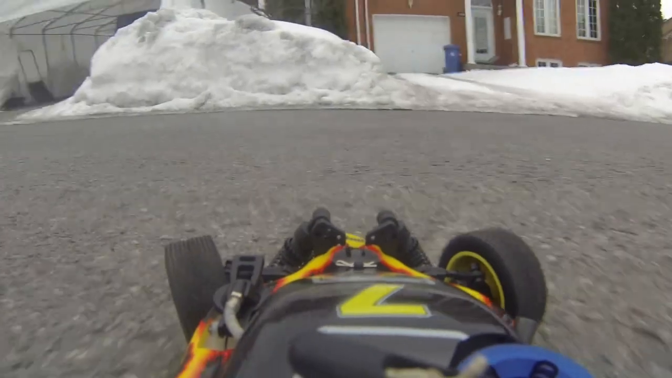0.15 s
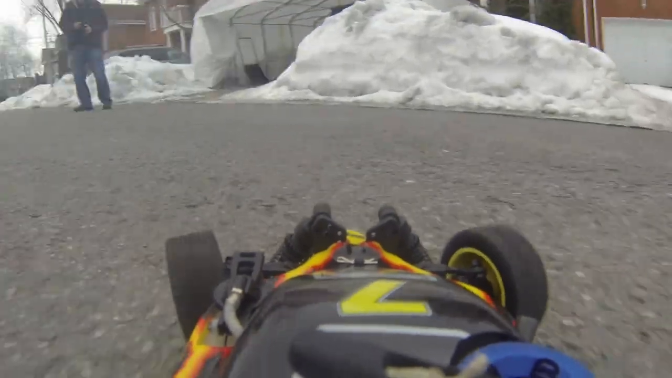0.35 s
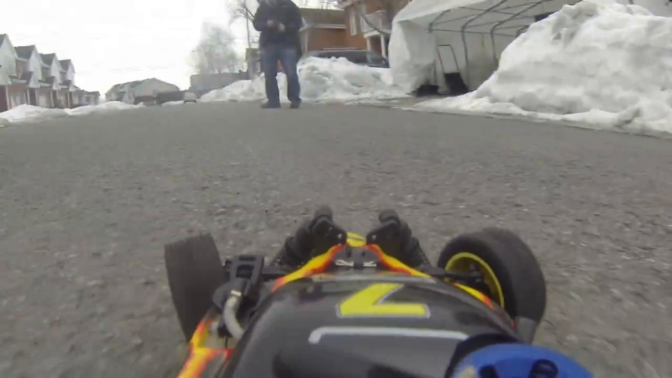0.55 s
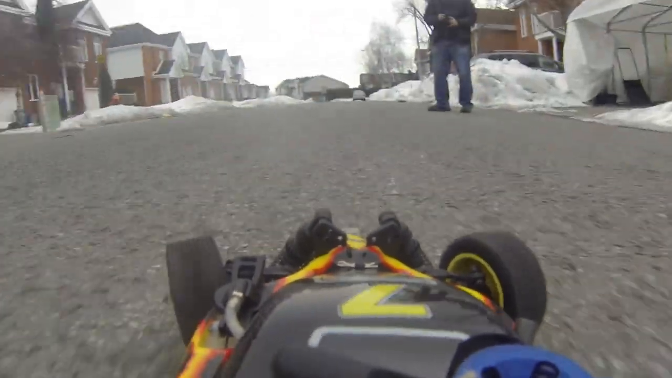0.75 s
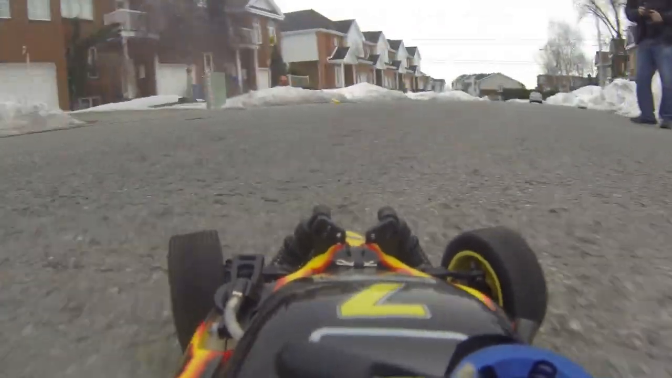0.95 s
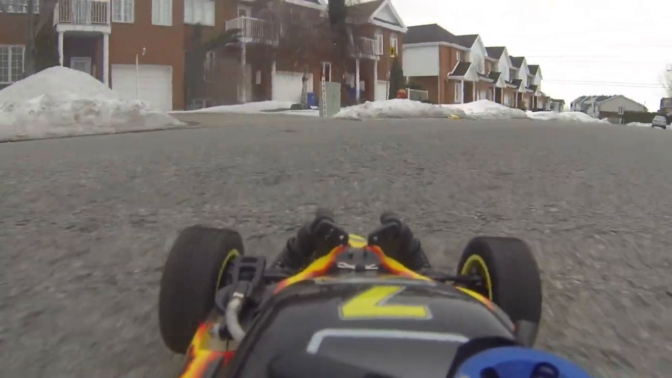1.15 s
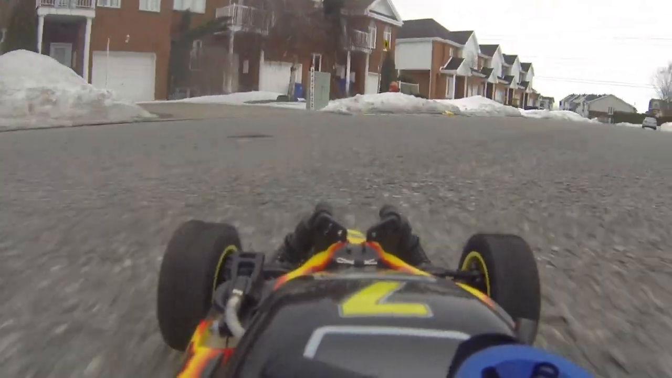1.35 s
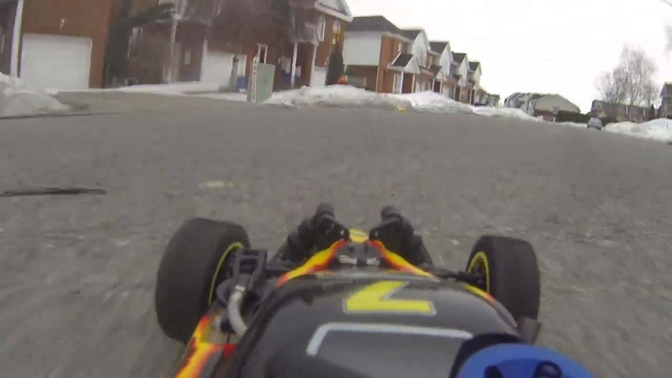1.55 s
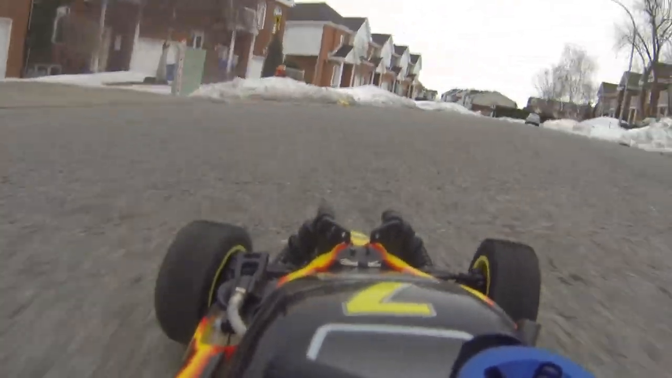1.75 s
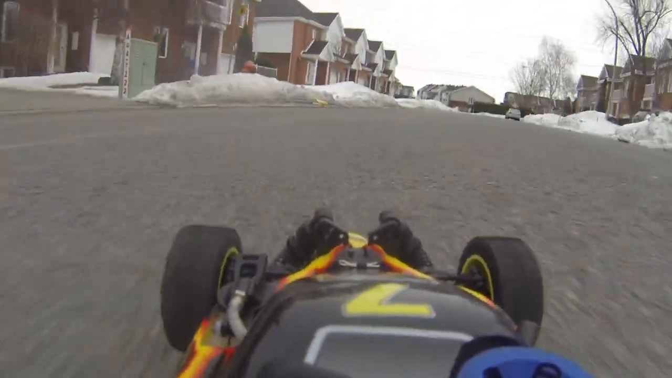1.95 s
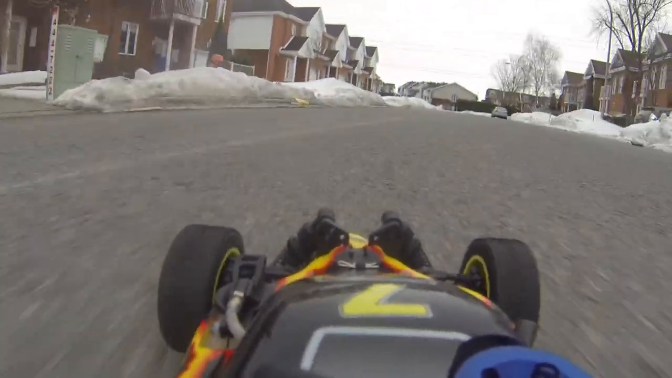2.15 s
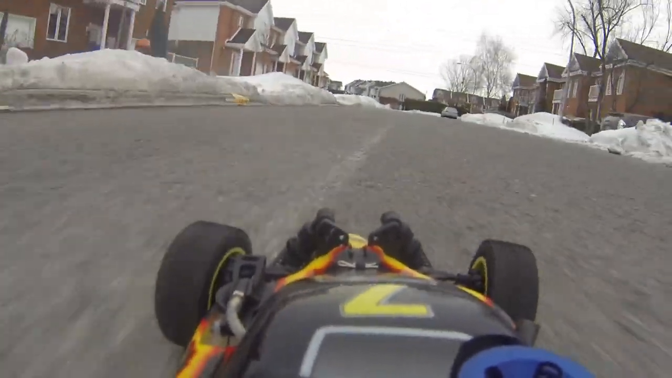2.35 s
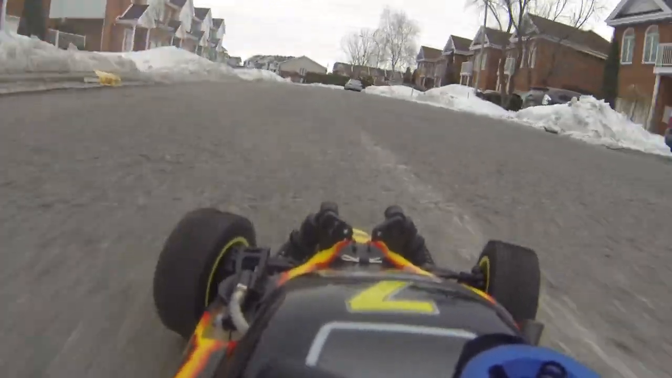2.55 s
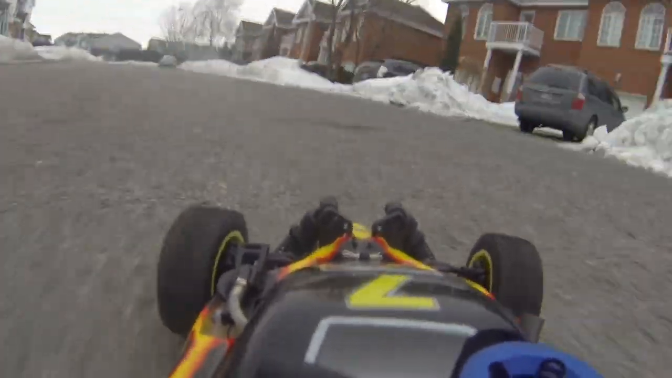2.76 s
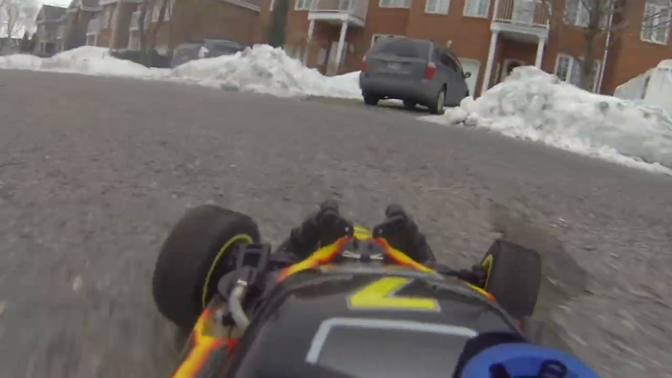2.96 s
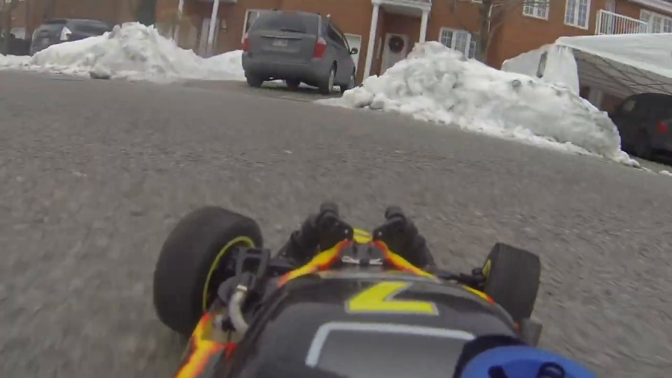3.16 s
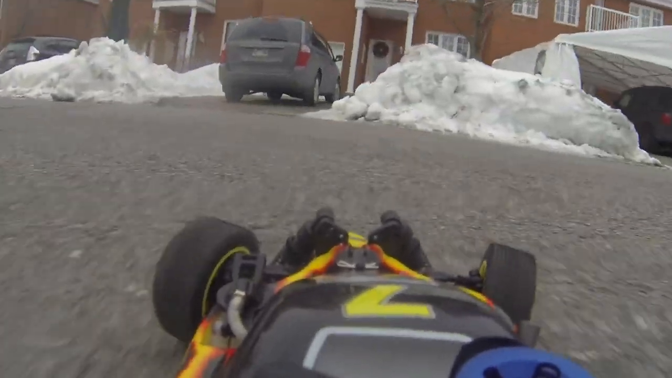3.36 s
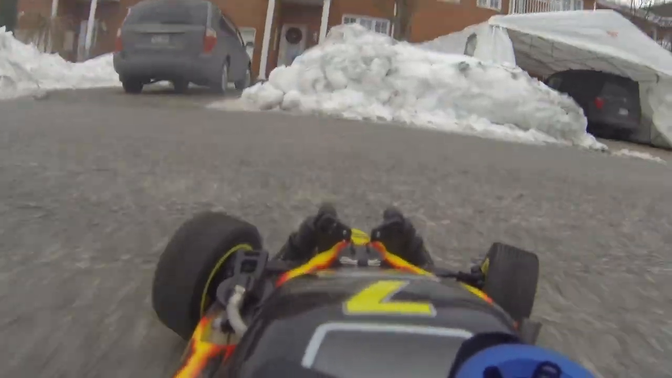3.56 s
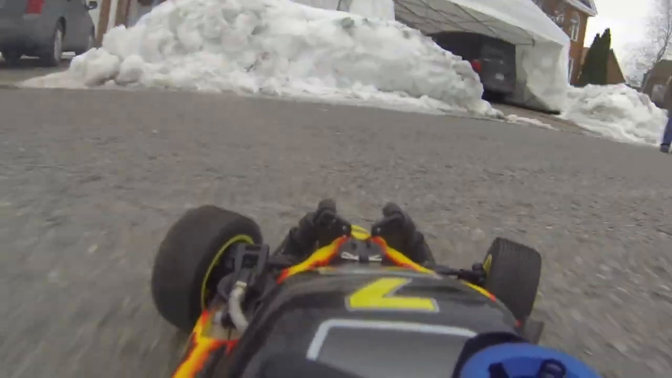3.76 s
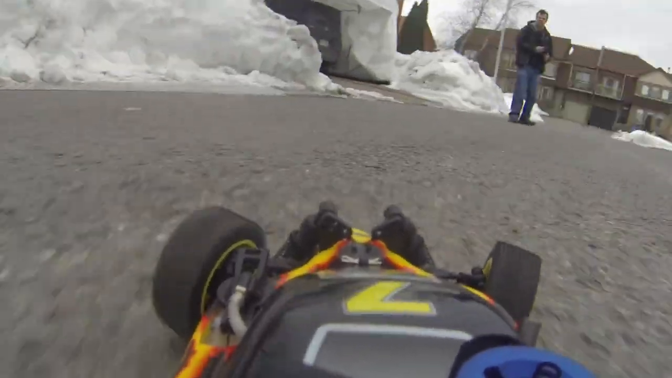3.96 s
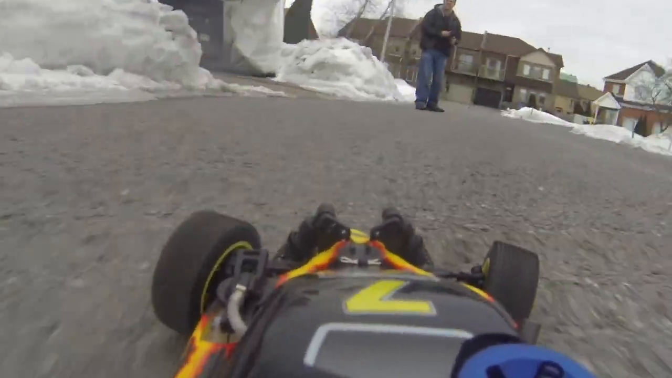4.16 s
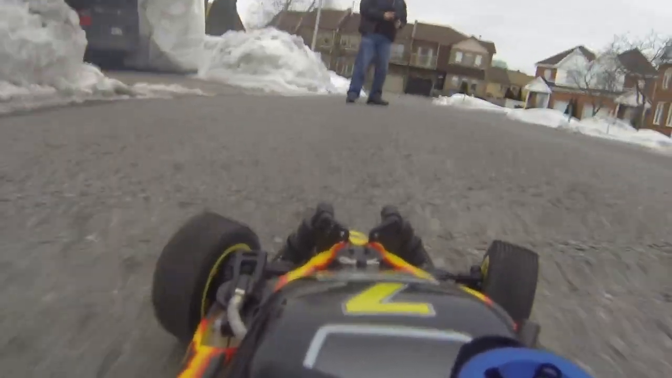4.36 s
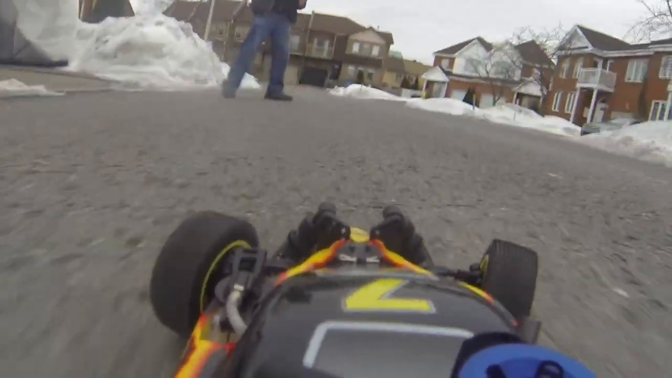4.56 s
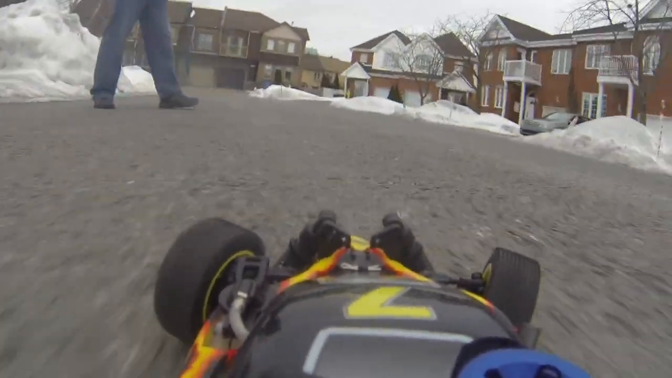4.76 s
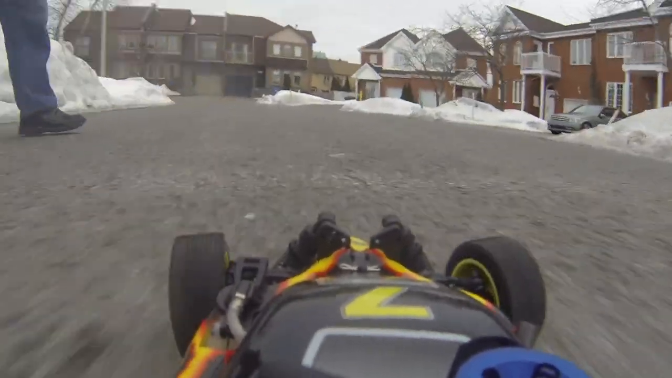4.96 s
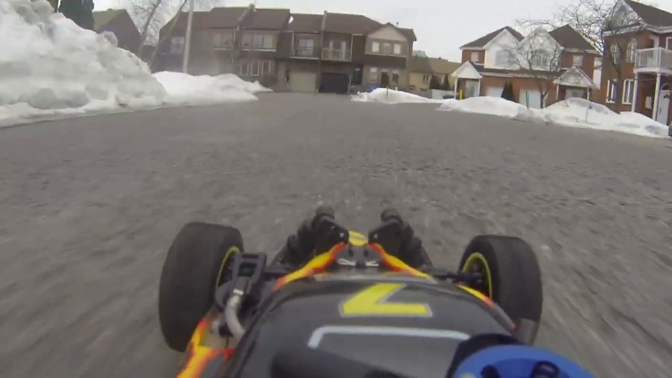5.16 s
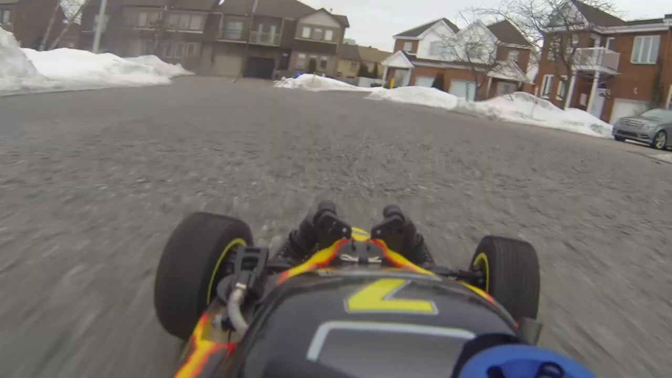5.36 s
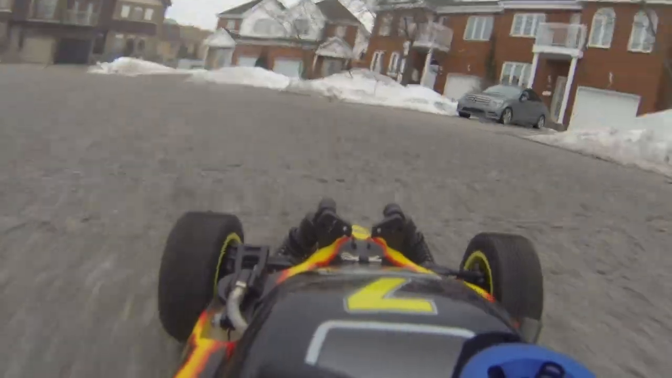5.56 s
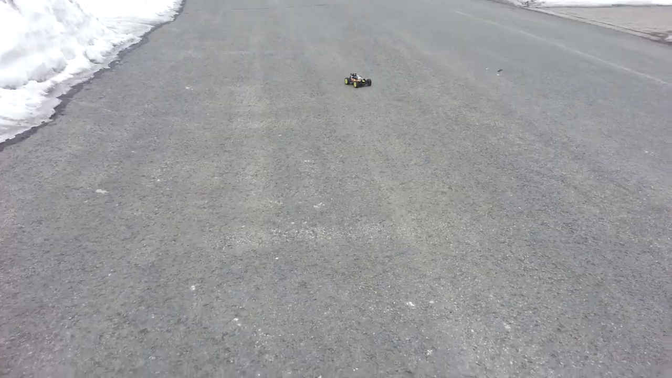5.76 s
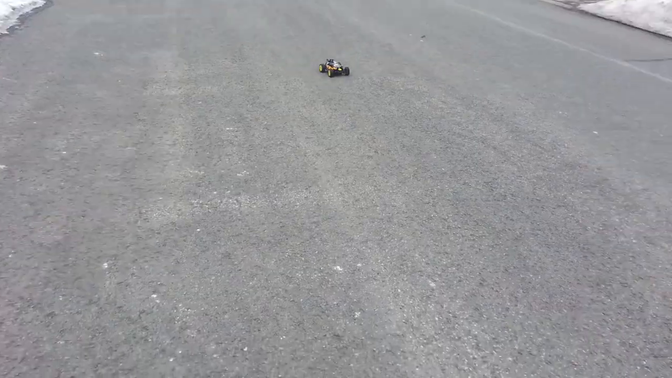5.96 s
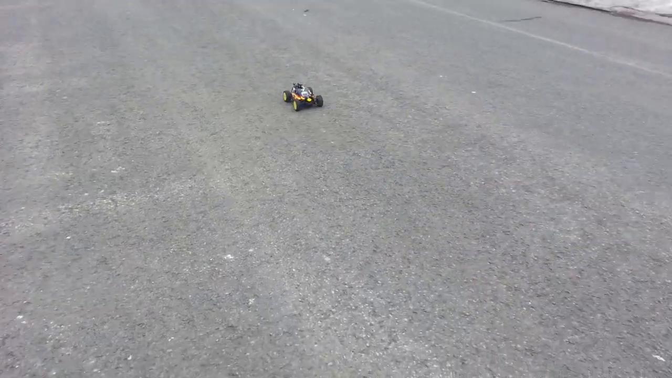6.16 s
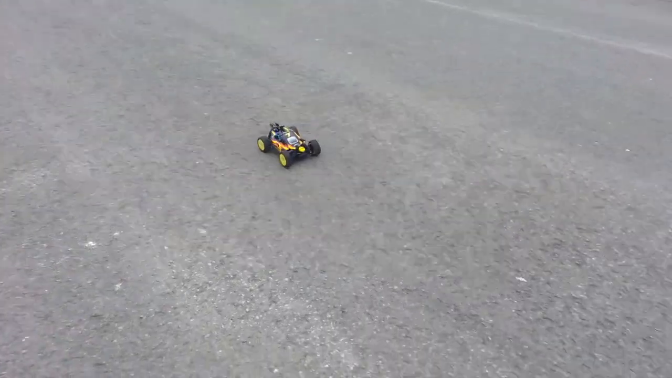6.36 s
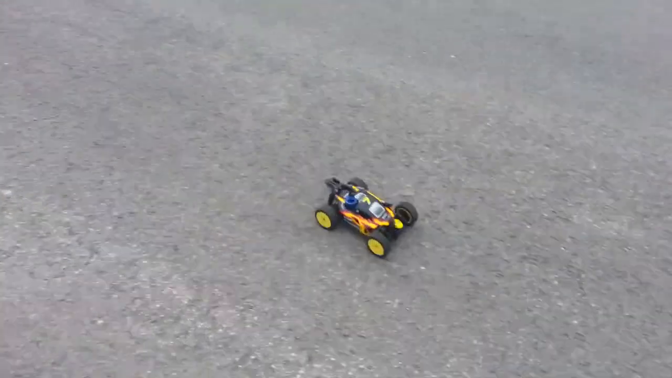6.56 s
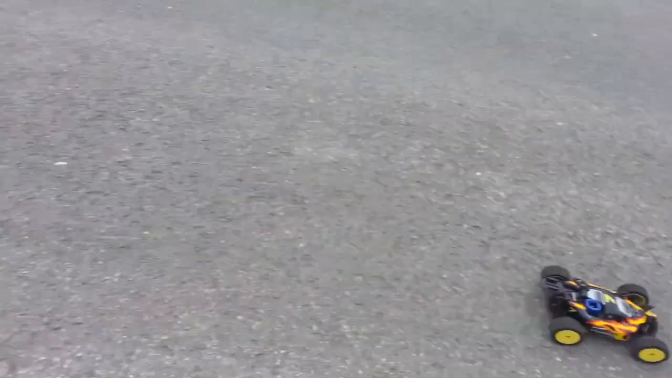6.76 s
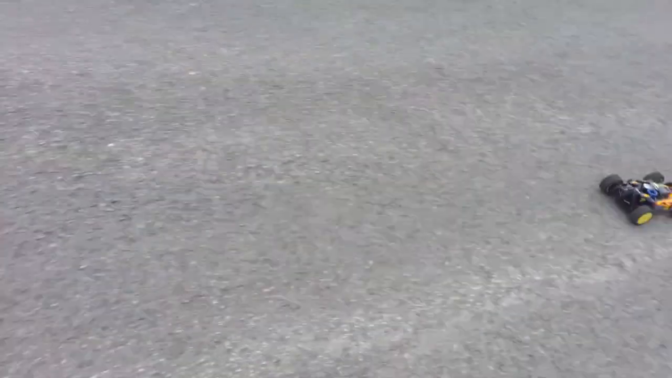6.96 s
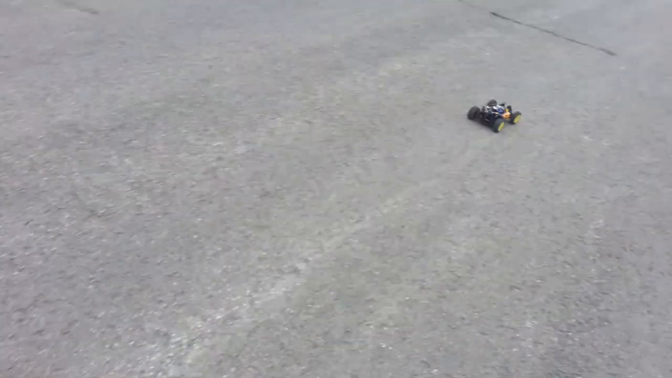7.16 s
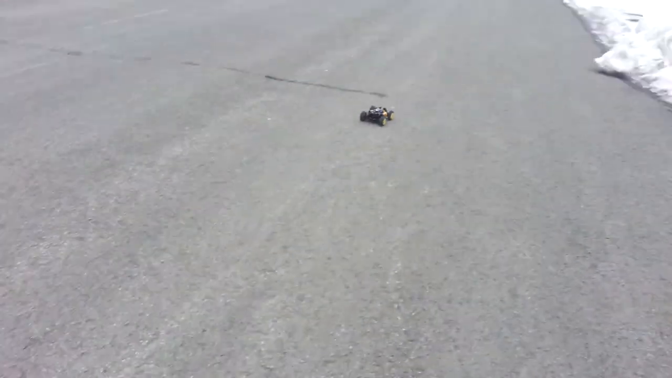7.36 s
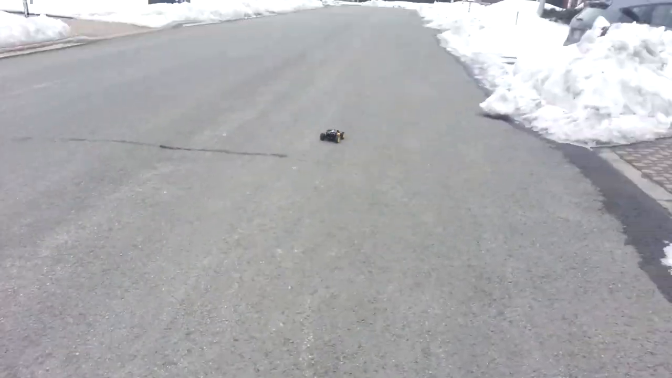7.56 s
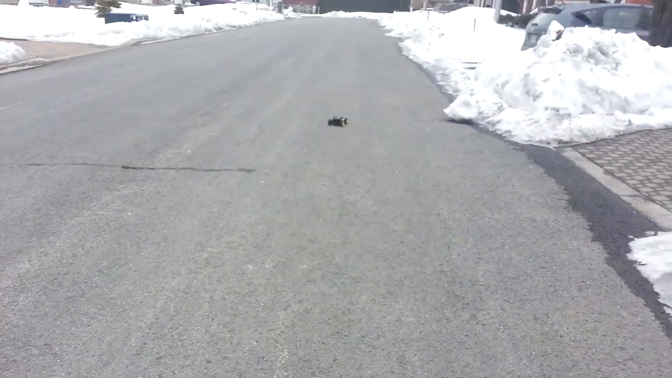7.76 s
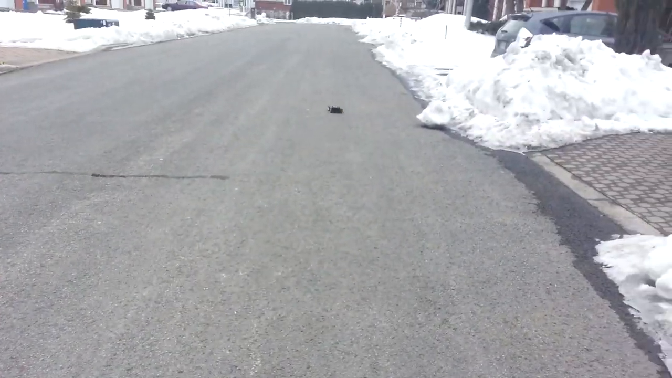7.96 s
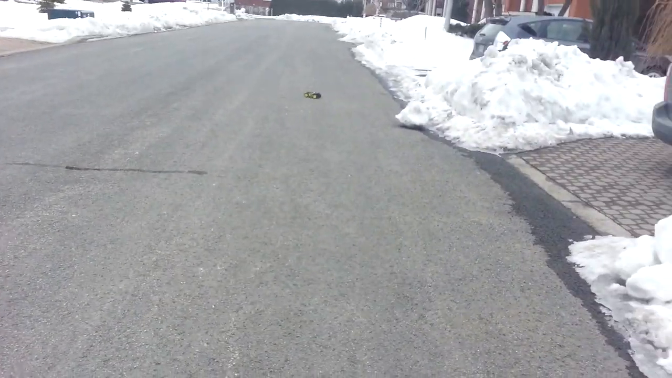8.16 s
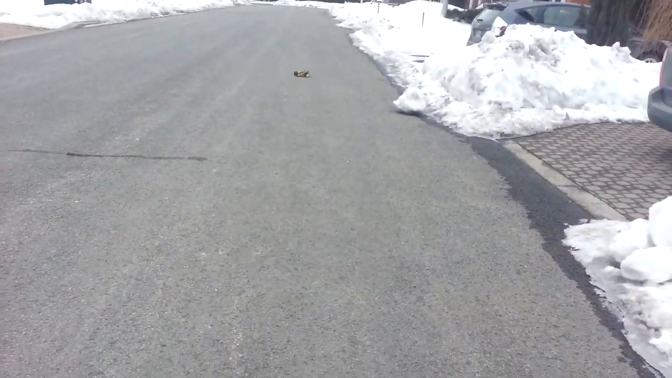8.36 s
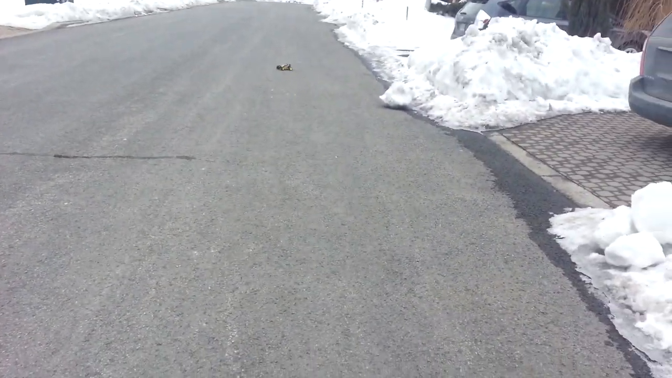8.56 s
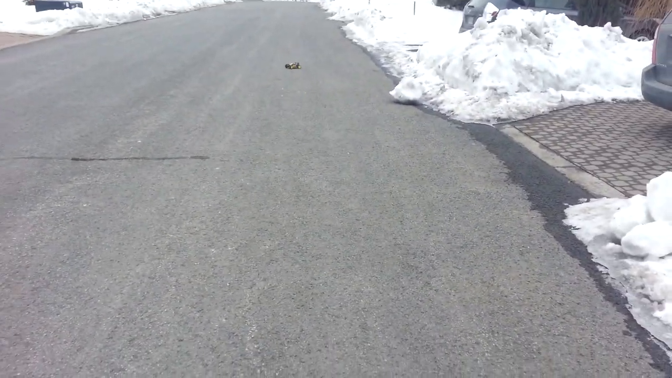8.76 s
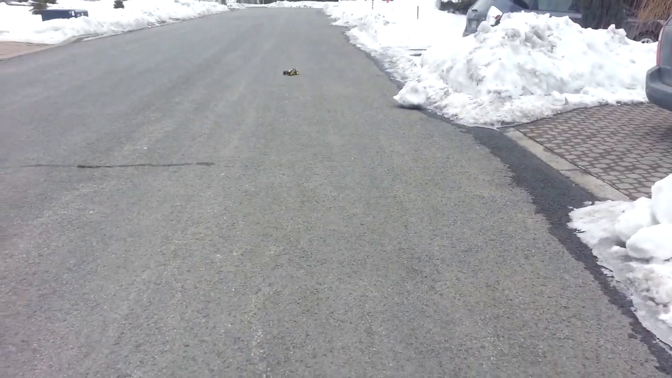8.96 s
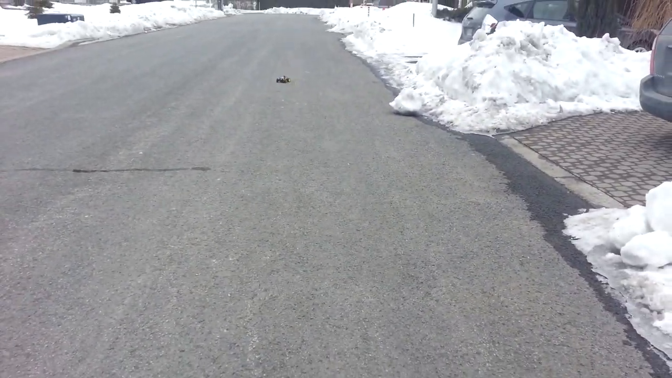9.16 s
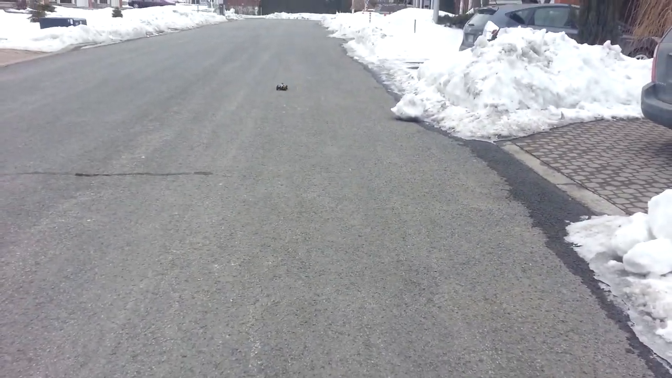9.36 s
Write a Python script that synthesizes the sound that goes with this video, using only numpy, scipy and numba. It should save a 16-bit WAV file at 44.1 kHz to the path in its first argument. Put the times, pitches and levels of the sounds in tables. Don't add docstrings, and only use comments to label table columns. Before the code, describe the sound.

From 0 to 5.7 seconds the microphone rides in a sealed case on a small two-stroke model car. A dull, nearly pure hum near 220 Hz chatters with short throttle bursts and low road rumble, with a bump near 0.25. From 1.4 it climbs to a strained peak around 2 seconds with ringing rattle and wavering gear whine, then falls by 2.7. It surges again around 3.2-3.5, drops with two small stone pings near 3.8, then revs from 4.1 to 5.4 and sinks. At 5.7 an abrupt cut goes to the roadside: a raspy, brighter exhaust buzz approaches, loudest at 6.5-7, passes, and recedes while its pitch creeps upward until 7.9. The throttle shuts, pitch falls to a weak distant idle by 8.3, with blips near 8.8 and 9.3. Wind thumps, mostly around 6-6.7, and tiny dropouts four times a second accompany it.

```python
import sys
import numpy as np
from scipy import signal
from scipy.fft import rfft, irfft
from scipy.io import wavfile
from scipy.ndimage import uniform_filter1d
from numba import njit

SR = 44100
rng = np.random.default_rng(int(sys.argv[2]) if len(sys.argv) > 2 else 0)


def volts_from_decibels(level):
    exponent = np.asarray(level, float) / 20
    return 10 ** exponent


def dump(signal):
    limited = np.clip(np.atleast_2d(signal).T, -1, 1)
    pcm = np.round(limited * 32767).astype(np.int16)
    wavfile.write(sys.argv[1], SR, pcm)


N = 414540
TIME = np.arange(N) / SR
SIDES = np.array([[1], [-1]])
CHANGE_S = 5.7446

# t/s, shaft speed approached f/Hz, lag/s, strain on the drive level/dB
THROTTLE = [(0, 219.7, 0.018, -0.5), (.491, 242, 0.016, 2), (.554, 212.4, 0.016, -0.5),
            (.668, 237.6, 0.024, 3), (0.807, 217.8, .013, 0), (1.0, 220.5, 0.0092, 3.5),
            (1.108, 239.7, 0.011, 4.5), (1.397, 726, 1.75, 1), (2.04, 466.6, 0.27, -2),
            (2.425, 213.8, 0.31, -2), (3.042, 209.9, .29, 0.5), (3.198, 308, 0.56, 3.5),
            (3.44, 440, 0.46, 0), (3.565, 225.6, .1, -4.5), (3.85, 224.6, .1, 3), (4.122, 334.3, 0.21, 2),
            (4.348, 287, 0.022, 1), (4.436, 451.7, 0.42, 0.5), (4.938, 334, 0.64, 0),
            (5.209, 371, 0.009, -0.5), (5.391, 222.4, 0.33, -1.5)]
# shaft f/Hz, hum level/dB, rattle level/dB, rumble level/dB, knock level/dB
BY_SPEED = [
    (221, -20, -34, -37.5, -39),
    (231.4, -20, -31, -39.5, -42.5),
    (286, -18, -37, -47, -34),
    (366, -19.5, -30, -40.5, -36.5),
    (440, -20, -22.5, -37, -31.5),
]
# t/s, f/Hz, level/dB
MESH_RUNS = [
    [(1.15, 960, -58), (1.22, 950, -35), (1.462, 1245, -35), (1.6, 1546, -55)],
    [(1.7, 1173, -45), (1.85, 1191, -29), (2.244, 1487, -30), (2.512, 1470, -33.5), (2.728, 1168, -49),
     (2.85, 1192, -64)],
    [(3.2, 1056, -43), (3.302, 1182, -34.5), (3.5, 1300, -44)],
    [(3.95, 1010, -64), (4.118, 1025, -33), (4.25, 1307, -47)],
    [(4.5, 1188, -55), (4.602, 1163, -31), (4.9, 1363, -26.5), (5.368, 1244, -33), (5.476, 1257, -55),
     (5.7, 877.3, -48)],
]
# f/Hz, width/Hz, level/dB
CASE = [(550, 425, -10.5), (983, 49, 4.5), (1174, 243, -1), (1300, 69.4, 7.5), (1510, 133, 5),
        (2060, 330, -1), (2570, 272, 0.5), (3073, 650, -6)]
CASE_TREBLE = [(3716, 100, 15.5), (4720, 240, 8), (5150, 480, 5), (7700, 900, -18.5), (7040, 380, -17),
               (10600, 620, -32), (12500, 3000, -37)]
# f/Hz, width/Hz, level/dB
MOUNT = [(582, 85, 3), (916, 59, 4), (992, 51, 2.5), (1204, 75, 5.5), (1566, 209, 7.5), (2010, 750, -5),
         (2594, 160, -7.5), (3800, 200, -14), (5230, 210, -19)]
# t/s, level/dB, length/s
BUMPS = [
    (.25, 8, 0.16),
    (2.75, 3.5, 0.17),
    (3.2, 7, 0.13),
    (5.5, 0.5, 0.23),
    (2.2, -8, 0.3),
    (4.7, -7, 0.22),
]
# t/s, peak level/dB, f/Hz, decay/s
GRIT = [
    (3.778, -24, 2900, 0.0073),
    (3.832, -24, 2900, 0.0067),
    (3.72, -37, 3300, .006),
]

# t/s, firing f/Hz
FIRING = [(5.75, 319), (5.88, 324), (5.98, 332.5), (6.06, 335.8), (6.13, 339), (6.2, 336.5), (6.3, 340.7),
          (6.55, 349.2), (6.81, 356.4), (7.05, 362.8), (7.31, 369.7), (7.6, 377.1), (7.89, 386.6),
          (7.93, 372.7), (8.05, 308), (8.17, 251.1), (8.28, 213.4), (8.77, 218.6), (8.825, 237.9),
          (8.88, 225.9), (8.96, 232.5), (9.02, 211.9), (9.22, 213.5), (9.33, 233.3), (9.4, 235.8)]
# t/s, strict alternation of strong and weak pops 0-1, timing scatter/us, tail level/dB, gas level/dB
BURN = [(5.75, .8, 12, -7.5, -6), (6.0, .7, 12, -7.5, -6), (6.2, .2, 12, -7.5, -6), (7.9, .2, 12, -8, -6),
        (7.95, .3, 18, -6.5, -6), (8.22, .3, 18, -6.5, -6), (8.32, .2, 12, -6.5, -7),
        (9.4, .2, 12, -6.5, -7)]
# t/s, level/dB, aim of the pipe at the phone level/dB
PASS = [(5.75, -21, 3), (6.11, -19.5, -5), (6.55, -18, 4.5), (6.74, -17, 1.5), (6.79, -20.5, 1),
        (6.86, -17.5, -2.5), (6.95, -21.5, 0), (7.05, -21.5, -10), (7.31, -20, 3), (7.89, -21.5, 0),
        (7.93, -29.5, 11.5), (8.17, -30.5, 2.5), (8.22, -27.5, 1), (8.3, -29.5, -2), (8.76, -33.5, -4.5),
        (8.825, -29, -3.5), (8.96, -31.5, 0), (9.02, -34.5, 0.5), (9.22, -32, -6.5), (9.33, -29, -3),
        (9.4, -25.5, -7.5)]
# t/s, index into the nine pipe colours below
FACING = [(5.9, 0), (6.2, 1), (6.45, 1), (6.62, 2), (6.76, 2), (6.85, 3), (7.1, 3), (7.25, 4), (7.45, 4),
          (7.65, 5), (7.9, 5), (7.95, 6), (8.2, 6), (8.3, 7), (8.77, 7), (8.82, 8), (8.97, 8), (9.02, 7),
          (9.22, 7), (9.32, 8)]
# f/Hz, level/dB
COMING = [(160, -35), (320, -13), (1300, -10.5), (1720, -10.5), (1930, -4.5), (2300, -11), (2740, -17.5),
          (3580, -7.5), (4600, -13), (5400, -19), (8500, -30), (13000, -32.5), (16500, -70.5)]
CLOSING = [(160, -43), (340, -10.5), (773, -14.5), (1030, -8.5), (1610, -12.5), (2070, -11), (2750, -15.5),
           (3700, -7.5), (4500, -21.5), (5700, -14.5), (6900, -20.5), (8500, -14.5), (13000, -29),
           (16500, -69)]
BESIDE = [(180, -38.5), (350, -11.5), (700, -16), (1080, -13), (2080, -13.5), (2900, -21.5), (3550, -13),
          (4250, -13.5), (5100, -8.5), (5800, -16), (6600, -12), (7600, -17.5), (14400, -27),
          (16500, -66.5)]
PASSED = [(180, -46.5), (360, -11), (720, -15), (1080, -11), (1800, -10), (2300, -15.5), (2900, -10),
          (4000, -10.5), (5040, -2.5), (5450, -12), (6100, -9.5), (6800, -10.5), (7400, -15.5),
          (11000, -17), (14400, -21.5), (16500, -67)]
TURNING = [(190, -47.5), (370, -6.5), (740, -11.5), (1490, -3), (2230, -4), (2900, -11.5), (3700, -13),
           (4650, -8.5), (5600, -15), (6900, -18), (8300, -15), (9500, -19), (11300, -14), (13000, -16.5),
           (14600, -33), (16500, -66.5)]
LEAVING = [(190, -58), (380, -12), (1140, -9), (1520, -5), (2280, -7), (2850, -15), (3420, -3.5),
           (3800, -10.5), (4560, -5.5), (5000, -7.5), (5700, -19), (6600, -14), (7800, -18.5),
           (11200, -21.5), (13000, -25), (14600, -36), (16500, -73)]
COASTING = [(130, -30.5), (300, -9.5), (600, -7), (1600, -5), (2400, -6), (3200, -8), (4100, -8.5),
            (4900, -7.5), (5600, -16.5), (7800, -21), (9000, -32), (10800, -29.5), (15000, -59.5)]
IDLING = [(110, -32), (215, -9), (650, -5.5), (860, -17.5), (1080, -5), (1420, -11), (1770, 1.5),
          (2150, -8.5), (2580, -9.5), (3300, -3), (3900, -5), (4300, -11.5), (4900, -9.5), (5500, -20),
          (6200, -19.5), (8800, -36.5), (10400, -29.5), (15000, -53)]
BLIPPING = [(110, -42), (230, -8.5), (465, -7), (800, -17.5), (1390, -8.5), (1860, -4), (2150, -14),
            (2550, -16.5), (3350, -6), (3950, -12.5), (4300, -13.5), (4900, -13), (5500, -19.5),
            (6300, -21.5), (8800, -36), (10400, -33.5), (15000, -57.5)]
# t/s, low f/Hz, middle f/Hz, high f/Hz, depth 0-1
GAPS = [(5.75, 2720, 5740, 9240, .3), (6.3, 2730, 5670, 9300, .4), (6.7, 2290, 5820, 9500, .5),
        (6.85, 3840, 7020, 11800, .7), (6.97, 4020, 7830, 12500, 0.6), (7.12, 3600, 7380, 12200, .7),
        (7.25, 3110, 6100, 10500, 0.6), (7.4, 3000, 5870, 9070, 0.5), (7.55, 3000, 5780, 8800, 0.7),
        (7.95, 2920, 5580, 8940, 0.7), (9.4, 2590, 5450, 8760, 0.5)]
# f/Hz, treble level/dB
TREBLE_NEED = [(8500, -56), (10200, -47), (10700, -33), (11300, -33), (12300, -33), (12800, -29),
               (13200, -24), (14000, -23), (14300, -42), (14600, -20)]
# start t/s, end t/s
SINGING_SPANS = [(5.71, 6.45), (6.3, 6.72), (6.6, 6.775), (6.785, 7.2), (7.15, 7.4), (7.16, 7.93),
                 (8.0, 8.3), (8.3, 8.79), (8.79, 9.02), (9.02, 9.24), (9.24, 9.45), (6.78, 6.9),
                 (6.9, 7.12)]
# f/Hz, level/dB
SINGING_NOTES = [
    [(660, -66.5), (1990, -34.5), (3300, -37.5), (3640, -25.5), (8400, -48.5)],
    [(690, -43), (2080, -33), (4150, -32.5), (6500, -35.5), (6900, -29), (6200, -36), (7600, -36.5)],
    [(3550, -23.5), (4250, -23), (4600, -22), (4950, -21.5), (5300, -25.5)],
    [(720, -61), (5040, -24.5), (5780, -40), (6150, -42), (6500, -39.5)],
    [(8100, -31), (8500, -34.5)],
    [(750, -78), (1500, -46), (2260, -28.5), (3400, -41), (4530, -36), (4900, -36)],
    [(1100, -44.5), (1600, -34), (2200, -38), (4400, -40)],
    [(650, -74), (1080, -58), (1300, -40), (1730, -46), (1950, -46), (3250, -44.5), (3900, -39.5)],
    [(1400, -53), (1860, -30.5), (3500, -40), (3950, -31.5)],
    [(640, -32), (3000, -40), (1280, -36), (1700, -48), (3200, -48), (3420, -41)],
    [(1400, -47.5), (1860, -38), (3500, -33), (3950, -52.5)],
    [(4630, -27), (4990, -19.5), (5340, -27.5)],
    [(5800, -33), (6150, -30.5), (6500, -32.5), (6870, -32)],
]
# t/s, peak level/dB, length/s, left minus right level/dB
GUSTS = [(6.012, -38, 0.043, 26), (6.4, -30.5, 0.31, -10.5), (6.7, -36, 0.12, -13.5),
         (7.156, -36.5, 0.038, 20), (7.339, -44.5, 0.066, 27), (8.07, -44.5, 0.11, -8),
         (8.317, -44, 0.036, 25), (8.77, -49, 0.05, 27), (9.043, -55, 0.075, 11)]
# t/s, peak level/dB, left minus right level/dB, length/s
THUMPS = [(6.026, -19.5, 29.0, 0.012), (6.052, -20.5, 12, 0.015), (6.183, -26, 0, 0.015),
          (6.2, -23.5, -18, 0.026), (6.304, -16.5, -7, 0.015), (6.33, -21, 8, 0.0091),
          (6.371, -18.5, -1, 0.013), (6.471, -15, -8.5, 0.012), (6.486, -16.5, -9, 0.019),
          (6.632, -15, -6.5, 0.018), (6.648, -22, -22.5, 0.021), (6.725, -32.5, -1, 0.027),
          (7.133, -35.5, 23, 0.013), (7.273, -27.5, 18, 0.012), (5.882, -29, 7, 0.015),
          (6.933, -30, 0.5, 0.012), (8.073, -32, 9, 0.025), (8.32, -27.5, 25, 0.014),
          (8.63, -27, 16.0, 0.0096), (8.76, -41, 13, 0.018), (8.79, -33, 19.0, 0.015),
          (8.989, -29.5, -4.5, 0.033), (9.02, -26, 19, 0.017)]


def track(table):
    s, *columns = np.transpose(table)
    return [np.interp(TIME, s, column) for column in columns]


def unit(x):
    return x / np.sqrt(np.mean(x ** 2))


def steady(x):
    return x / np.sqrt(uniform_filter1d(x ** 2, size=SR // 20) + 1e-12)


@njit
def svf(x, hz, width):
    y, band, low = np.empty(len(x)), 0., 0.
    for i in range(len(x)):
        g, k = np.tan(np.pi * hz[i] / SR), width / hz[i]
        v = (band + g * (x[i] - low)) / (1 + g * (g + k))
        band, low, y[i] = 2 * v - band, low + 2 * g * v, k * v
    return y


def ring(x, modes):
    out = 0
    for k, (hz, width, db) in enumerate(modes):
        out = out + (-1) ** k * volts_from_decibels(db) * svf(x, np.full(N, 1. * hz), 1. * width)
    return out


def butter(x, hz, kind, order=4):
    return signal.sosfilt(signal.butter(order, hz, kind, fs=SR, output="sos"), x)


def band_noise(low_hz, high_hz):
    return unit(butter(rng.standard_normal(N), [low_hz, high_hz], "band", order=2))


def walk(rate):
    k = int(SR / rate)
    held = np.repeat(rng.standard_normal(N // k + 1), k)
    return unit(uniform_filter1d(uniform_filter1d(held, k), k)[:N])


def firings(hz, scatter_db, late_s, alternate):
    turns = np.cumsum(hz) / SR
    k = np.arange(1, int(turns[-1]))
    chance = rng.standard_normal((N // 64, 3))[k].T
    due = np.interp(k, turns, np.arange(N))
    at = np.clip(due + late_s[due.astype(int)] * SR * chance[0], 8, N - 9)
    swing = (-1.) ** (k + np.cumsum(chance[2] > 1.3))
    share = alternate[due.astype(int)]
    strength_db = scatter_db * (share * swing + (1 - share / 2) * np.tanh(chance[1])) / 2
    taps = np.round(at).astype(int)[:, None] + np.arange(-7, 8)
    offset = taps - at[:, None]
    click = np.sinc(offset) * np.cos(offset * np.pi / 16) ** 2
    even, uneven = np.zeros(N), np.zeros(N)
    np.add.at(even, taps, click)
    np.add.at(uneven, taps, click * volts_from_decibels(strength_db)[:, None])
    return even, uneven, turns % 1


def lagged(targets, lags_s):
    out = np.full(N, 1. * targets[0])
    for s, target, lag in zip(np.transpose(THROTTLE)[0], targets, lags_s):
        a = int(max(s, 0) * SR)
        out[a:] = target + (out[a] - target) * np.exp(-(TIME[a:] - TIME[a]) / lag)
    return out


def ride():
    _, aim_hz, lag_s, strain_db = np.transpose(THROTTLE)
    hz = lagged(aim_hz, lag_s) * (1 + .009 * walk(25))
    strain = lagged(strain_db, np.full(len(lag_s), 0.053))
    speeds, *levels = np.transpose(BY_SPEED)
    hum, rattle, rumble, knock = (np.interp(hz, speeds, db) for db in levels)
    treble_db = -17 + 0.16 * strain + 3 * np.clip((hz - 400) / 40, 0, 1)
    return hz, hum + 0.26 * strain, rattle + strain, treble_db, rumble + 0.39 * strain, knock + 0.87 * strain


def shaft_hum(phase, hum_db):
    return np.sqrt(2) * volts_from_decibels(hum_db + .9 * walk(30)) * np.sin(2 * np.pi * phase)


def half_order(hz):
    level_db = -37.5 + 0.15 * (hz - 438.5) + 1.5 * walk(5.6)
    return volts_from_decibels(level_db) * np.sin(np.pi * np.cumsum(hz) / SR)


def case_rattle(shake, treble_db):
    body = unit(butter(ring(shake, CASE), 470, "high", order=2))
    treble = unit(butter(ring(shake, CASE_TREBLE), 1600, "high", order=2))
    return body - volts_from_decibels(treble_db) * treble


def road_rumble():
    bumps = volts_from_decibels(sum(db * np.exp(-((TIME - s) / length) ** 2) for s, db, length in BUMPS))
    plate = band_noise(285, 365)
    return bumps * band_noise(16, 36) + 0.91 * band_noise(60, 250) + 0.99 * plate


def flywheel_fan(hz, phase):
    level_db = -51 + .2 * np.minimum(hz - 435, 0) + 2 * walk(30)
    return volts_from_decibels(level_db) * np.sin(2 * np.pi * 12 * phase)


def lid_buzz(hz, shake):
    return volts_from_decibels(-42 + .15 * np.minimum(hz - 375, 0)) * unit(ring(shake, [(2620, 70, 0)]))


def gears():
    out = 0
    for run in MESH_RUNS:
        hz, db = track(run)
        start, end = run[0][0], run[-1][0]
        on = np.interp(TIME, [start - .03, start, end, end + .03], [0, 1, 1, 0])
        for ratio, stage_db in ((1, 2), (1.165, -2), (2, -10)):
            phase = 2 * np.pi * np.cumsum(ratio * hz * (1 + 0.0035 * walk(50))) / SR
            out = out + on * volts_from_decibels(db + stage_db + 1.6 * walk(40)) * np.sin(phase)
    return out


def grit():
    out = 0
    for s, db, hz, decay_s in GRIT:
        t = np.maximum(TIME - s, 0)
        envelope = (1 - np.exp(-t / 0.0018)) * np.exp(-t / decay_s)
        out = out + volts_from_decibels(db) * envelope * np.sin(2 * np.pi * hz * t)
    return out


def on_board():
    hz, hum_db, rattle_db, treble_db, rumble_db, knock_db = ride()
    _, pulses, phase = firings(hz, 5.0, np.full(N, .00002), np.zeros(N))
    shake = rng.standard_normal(N) * (.6 + np.exp(-phase / .5)) * volts_from_decibels(.9 * walk(45) + .3 * walk(8))
    knocks = volts_from_decibels(knock_db) * unit(ring(butter(pulses, 400, "high"), MOUNT))
    shaft = shaft_hum(phase, hum_db) + half_order(hz) + flywheel_fan(hz, phase)
    case = volts_from_decibels(rattle_db) * case_rattle(shake, treble_db) + lid_buzz(hz, shake) + grit()
    return shaft + case + knocks + gears() + volts_from_decibels(rumble_db) * road_rumble()


def passing():
    (hz,), (level_db, aim_db) = track(FIRING), track(PASS)
    hz = hz * (1 + .0022 * walk(30))
    near = np.exp(-((TIME - 7.06) / 0.22) ** 2)
    coming_db, gone_db = -12.5, -7
    far_db = coming_db + (gone_db - coming_db) * np.clip((TIME - CHANGE_S) / 0.47, 0, 1)
    treble_db = far_db + 6.5 * near + 0.38 * aim_db - 4.5
    *gaps_hz, depth = track(GAPS)
    return hz, level_db, treble_db, 5.5 - 1.5 * near, gaps_hz, depth


def exhaust_pops(even, uneven, tail_db):
    difference = uneven - uneven.mean() / even.mean() * even
    pops = unit(even) + volts_from_decibels(-6.5) * unit(butter(difference, 700, "high", order=2))
    pops = -butter(pops, 6500, "low", order=1)
    pops = pops - 2 * svf(pops, np.full(N, 3000.), 5000.)
    tail = rng.standard_normal((2, 3000)) * np.exp(-np.arange(3000) / SR / .018)
    struck = (pops * (1 + .5 * walk(120)))[None]
    scattered = signal.fftconvolve(struck, tail, axes=1)[:, :N]
    return pops + volts_from_decibels(tail_db) * unit(butter(scattered, 800, "high", order=1))


def gas_puffs(phase):
    hiss = rng.standard_normal(N) + .6 * rng.standard_normal((2, N))
    return unit((1.2 + np.exp(-phase / .3)) * butter(hiss, 2500, "high", order=1))


def colour(x, points):
    hz, db = np.transpose(points)
    grid_hz = np.linspace(1, SR / 2, num=513)
    outline_db = np.interp(np.log(grid_hz), np.log(hz), np.maximum(db, -70))
    cepstrum = irfft(outline_db * np.log(10) / 20)
    cepstrum[1:512] *= 2
    cepstrum[513:] = 0
    return signal.fftconvolve(x, irfft(np.exp(rfft(cepstrum)))[None], axes=1)[:, :N]


def patchy(treble, treble_db):
    hz, s, cells = signal.stft(treble, SR, nperseg=1024)
    at = np.minimum((s * SR).astype(int), N - 1)
    beside_db = 9 * ((s > 6.69) & (s < 7.18))
    for low_hz in range(8600, 14900, 300):
        need_db = np.interp(low_hz, *np.transpose(TREBLE_NEED))
        keep = treble_db[at] + beside_db + 7.0 * walk(30)[at] > need_db
        cells[:, (hz >= low_hz) & (hz < low_hz + 300)] *= keep
    cells[:, hz > 14200] *= volts_from_decibels(np.where((s > 7.0) & (s < 7.93), 13, -8))
    cells[:, hz > 14650] *= volts_from_decibels(-33.0)
    return signal.istft(cells, SR, nperseg=1024)[1][:, :N]


def singing(engine, hz):
    out = np.zeros(N)
    for (start, end), notes in zip(SINGING_SPANS, SINGING_NOTES):
        a = slice(int(start * SR), min(int(end * SR), N))
        swell = np.clip(np.minimum(TIME[a] - start, end - TIME[a]) / 0.039, 0, 1)
        for note_hz, db in notes:
            multiple = np.round(note_hz / hz[a].mean())
            tone = svf(engine[a], multiple * hz[a], .3 * multiple ** 2 + 20)
            out[a] += swell * volts_from_decibels(db - 9.0) * steady(tone)
    return out


def exhaust():
    hz, level_db, treble_db, pan_db, gaps_hz, depth = passing()
    (facing,), (alternate, late_us, tail_db, gas_db) = track(FACING), track(BURN)
    even, uneven, phase = firings(hz, 5.5, late_us / 1e6, alternate)
    flow = exhaust_pops(even, uneven, tail_db) + volts_from_decibels(gas_db) * gas_puffs(phase)
    faces = (COMING, CLOSING, BESIDE, PASSED, TURNING, LEAVING, COASTING, IDLING, BLIPPING)
    x = 0
    for k, face in enumerate(faces):
        x = x + np.clip(1 - abs(facing - k), 0, 1) * unit(colour(flow, face))
    for gap_hz, width_hz, share in zip(gaps_hz, (860., 1900., 2000.), (0.55, .95, 0.99)):
        x = x - np.clip(share * depth, 0, 1) * np.array([svf(port, gap_hz, width_hz) for port in x])
    low = signal.sosfiltfilt(signal.butter(7, 5700, fs=SR, output="sos"), x)
    body = steady(butter(low, 140, "high", order=2))
    body = body + (volts_from_decibels(-3.0 * SIDES) - 1) * butter(body, 4500, "high", order=1)
    treble = volts_from_decibels(treble_db - 2.2 * SIDES) * patchy(steady(x - low), level_db + treble_db)
    engine = body + treble
    return volts_from_decibels(SIDES * (pan_db / 2 + 1.73)) * (volts_from_decibels(level_db) * engine + singing(engine.mean(axis=0), hz))


def gusts():
    lull_db = -18 * np.exp(-((TIME - 7.7) / 0.09) ** 2)
    out = volts_from_decibels(-51.5 + lull_db) * np.ones((2, 1))
    for s, db, length, pan_db in GUSTS:
        shape = np.exp(-((TIME - s) / length) ** 2)
        out = out + volts_from_decibels(db + np.minimum(SIDES * pan_db, 0) * 0.88) * shape
    return out


def port_air():
    ports = []
    for _ in SIDES:
        rumble = butter(butter(rng.standard_normal(N), 400, "low", order=2), 85, "high", order=6)
        ports.append(unit(rumble) * volts_from_decibels(4.5 * np.tanh(walk(40))))
    air = np.array(ports)
    return 0.33 * air + 0.84 * air[0]


def wind():
    puff = steady(butter(rng.standard_normal((2, N)), [110, 420], "band", order=2))
    out = port_air() * volts_from_decibels(1.0) * gusts()
    for s, peak_db, pan_db, length in THUMPS:
        a = slice(int((s - .02) * SR), int((s + .06) * SR))
        shape = np.exp(-((TIME[a] - s - length / 2) / length) ** 2 * 2)
        out[:, a] += volts_from_decibels(peak_db - 2.5 + np.minimum(SIDES * pan_db, 0)) * shape * puff[:, a]
    return out * volts_from_decibels(4.0 * SIDES)


def skips():
    since = (TIME - CHANGE_S) % .256
    fade_s = np.where(TIME < CHANGE_S + .1, .009, .017)
    return np.clip(.18 + since / fade_s, 0, 1)


def scene():
    pan = volts_from_decibels(np.array([[3.0], [-4.66]]))
    riding = butter(on_board(), 12500, "low", order=4) * pan
    kerb = butter(skips() * (exhaust() + wind()), 58, "high", order=2)
    return np.where(TIME < CHANGE_S, riding, kerb)


def low_pass(x):
    return signal.sosfilt(signal.butter(12, 16410, fs=SR, output="sos"), x)


def record(dry):
    over = np.maximum(abs(dry) - 0.24, 0)
    held = dry - np.sign(dry) * (over - .45 * np.tanh(over / .45))
    return low_pass(held)


dry = scene()
out = record(dry)
dump(out)
```